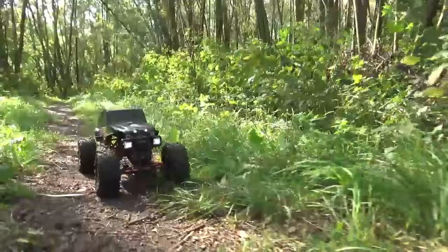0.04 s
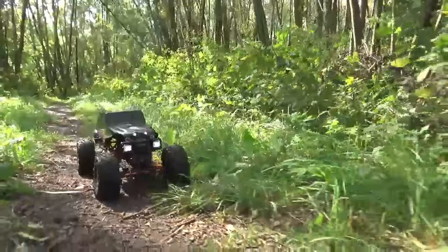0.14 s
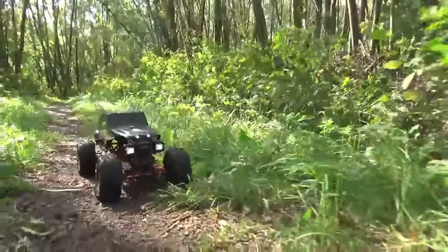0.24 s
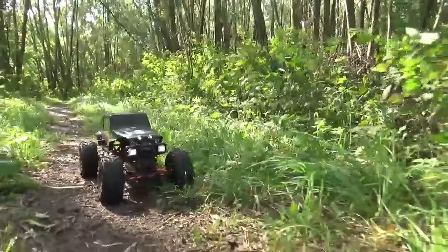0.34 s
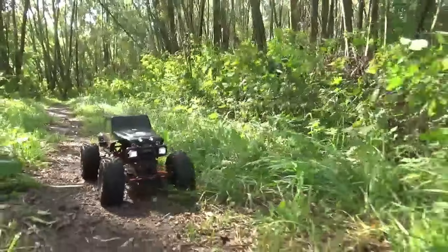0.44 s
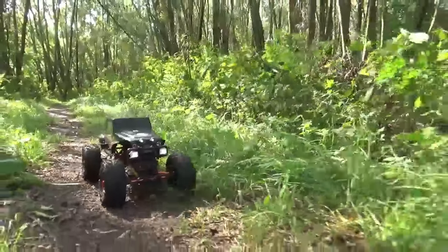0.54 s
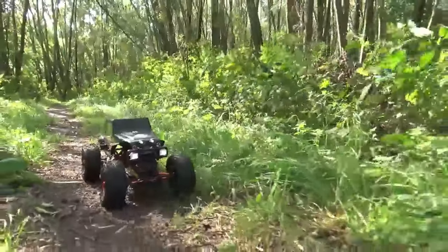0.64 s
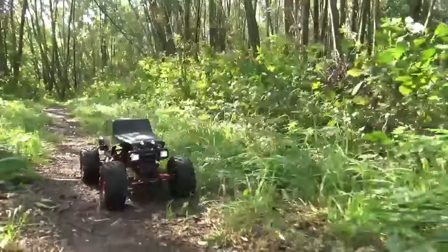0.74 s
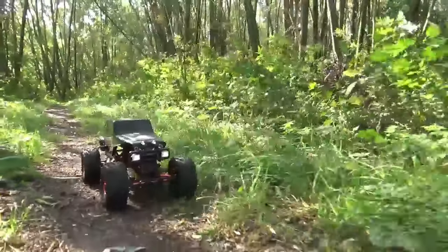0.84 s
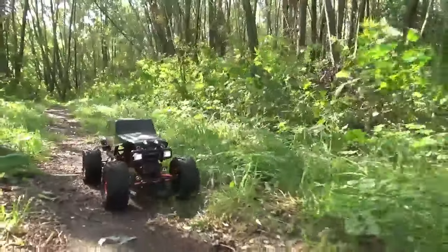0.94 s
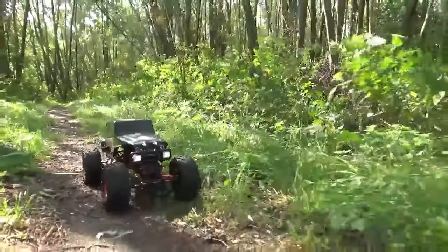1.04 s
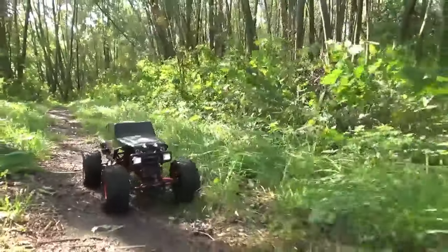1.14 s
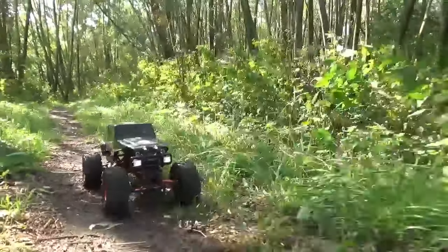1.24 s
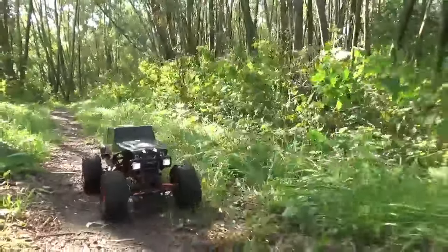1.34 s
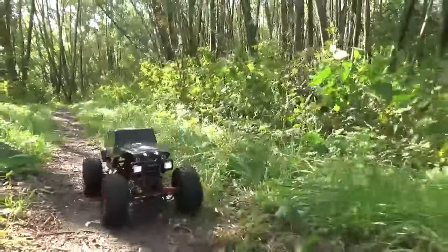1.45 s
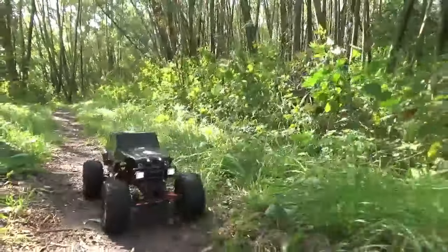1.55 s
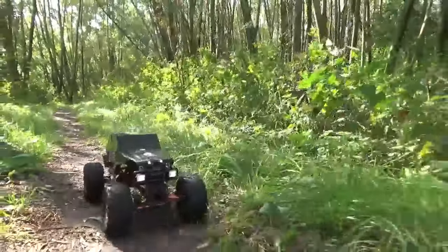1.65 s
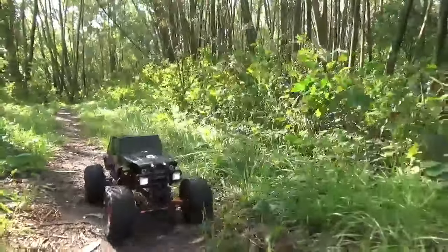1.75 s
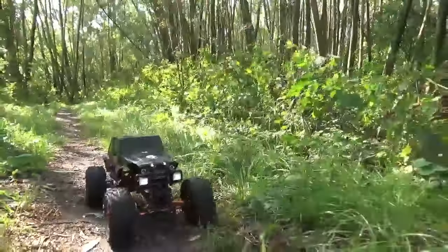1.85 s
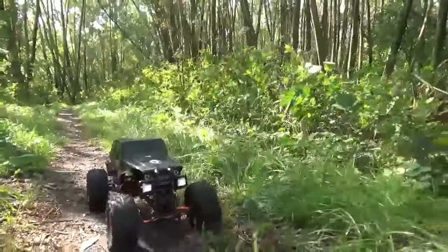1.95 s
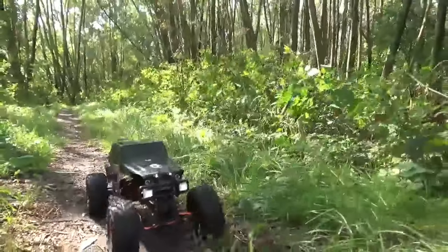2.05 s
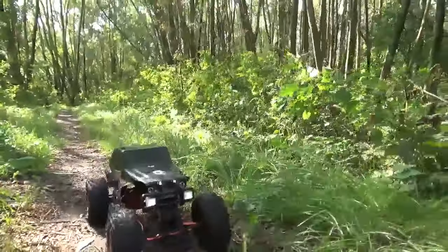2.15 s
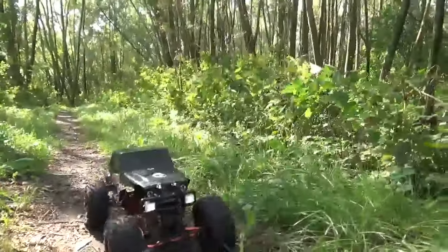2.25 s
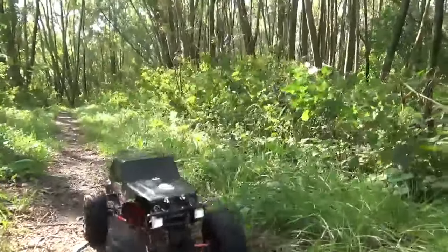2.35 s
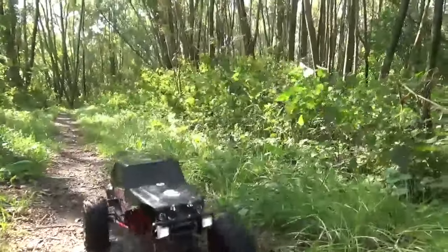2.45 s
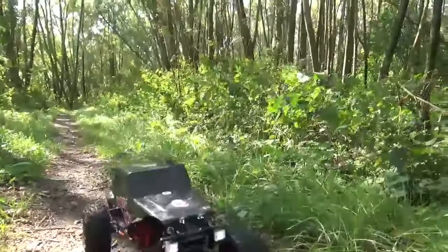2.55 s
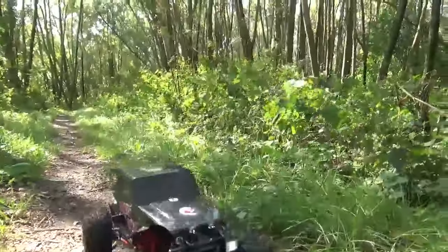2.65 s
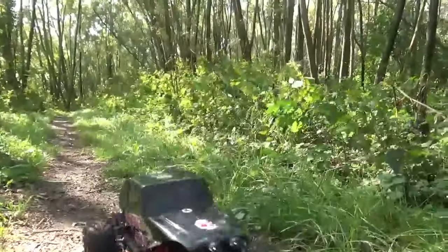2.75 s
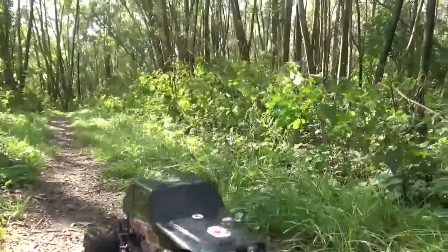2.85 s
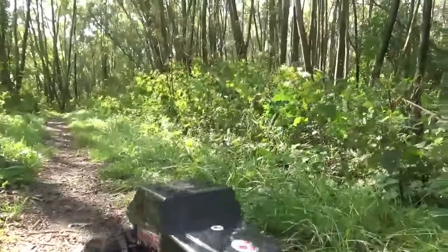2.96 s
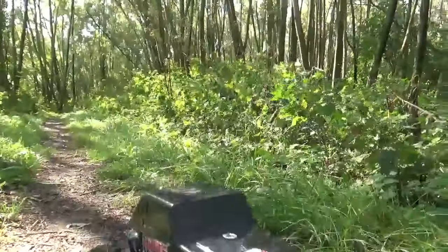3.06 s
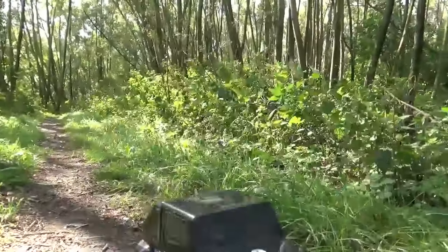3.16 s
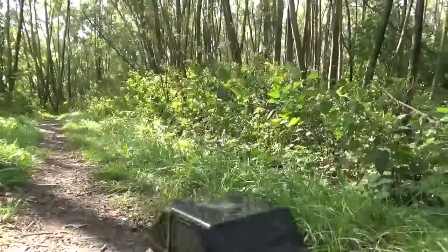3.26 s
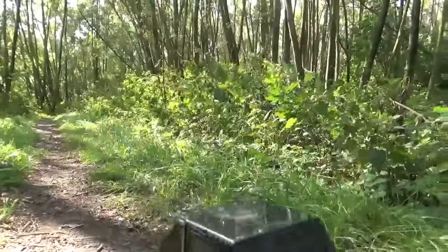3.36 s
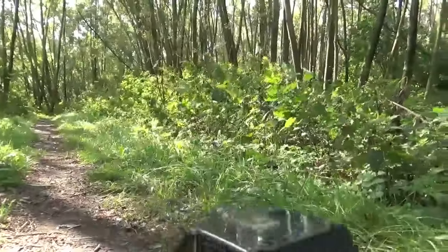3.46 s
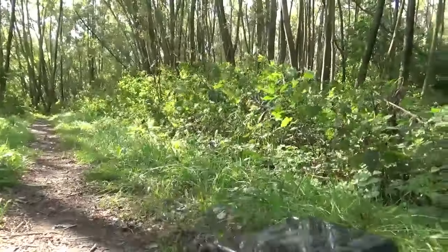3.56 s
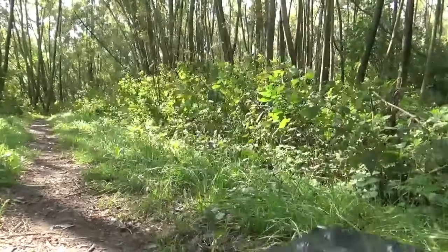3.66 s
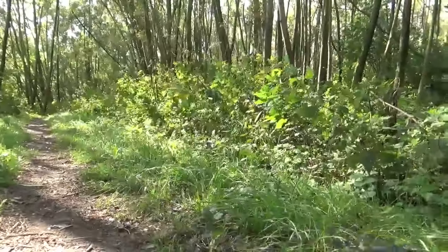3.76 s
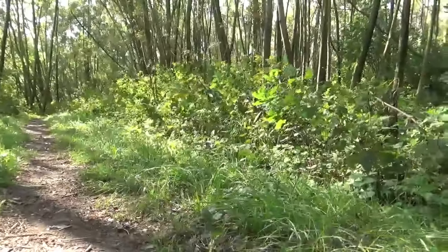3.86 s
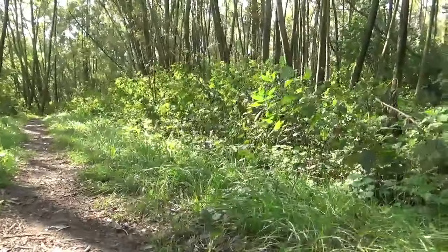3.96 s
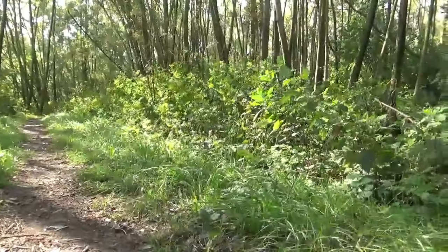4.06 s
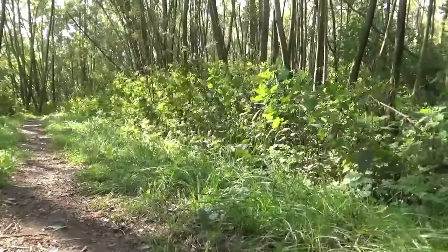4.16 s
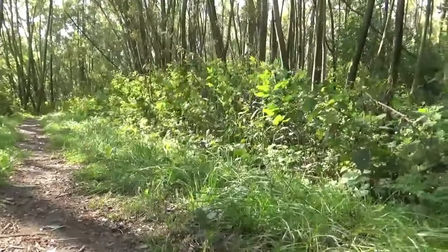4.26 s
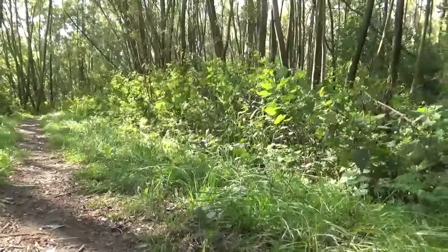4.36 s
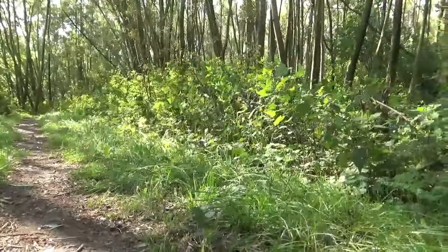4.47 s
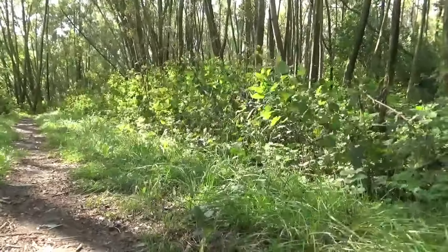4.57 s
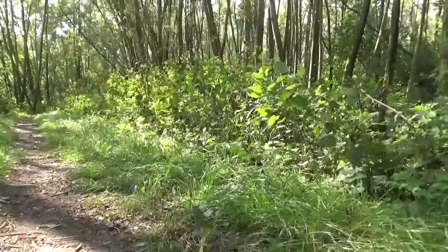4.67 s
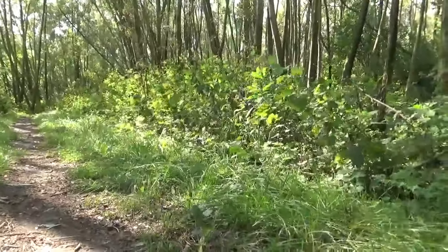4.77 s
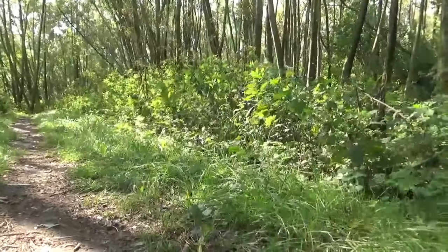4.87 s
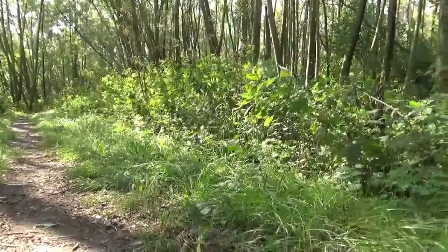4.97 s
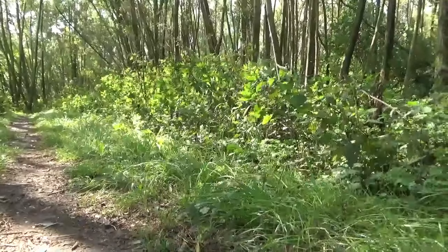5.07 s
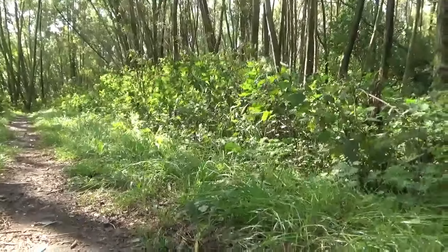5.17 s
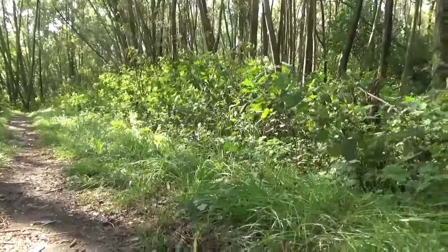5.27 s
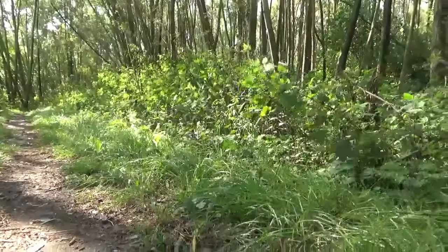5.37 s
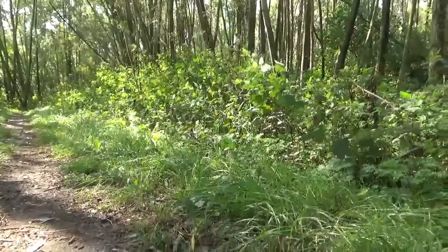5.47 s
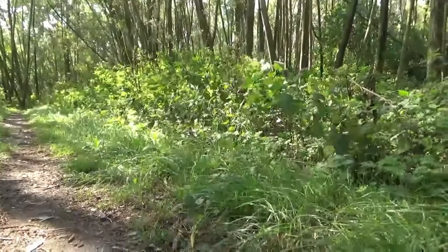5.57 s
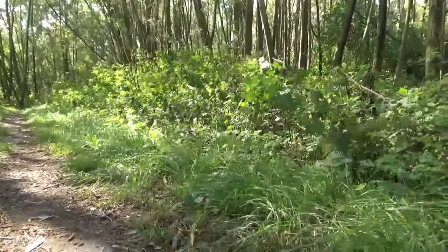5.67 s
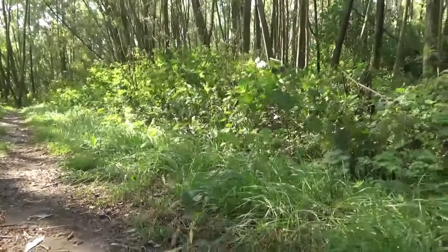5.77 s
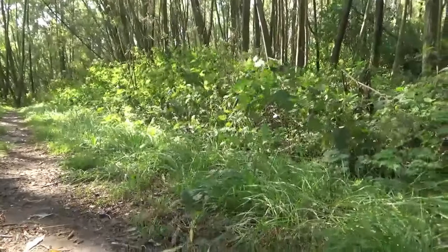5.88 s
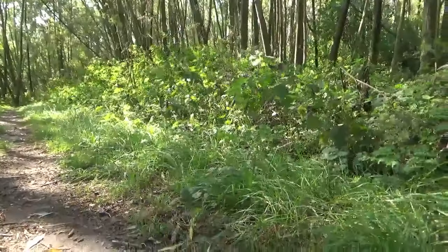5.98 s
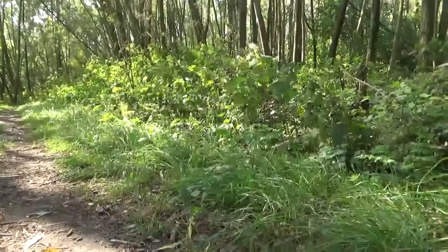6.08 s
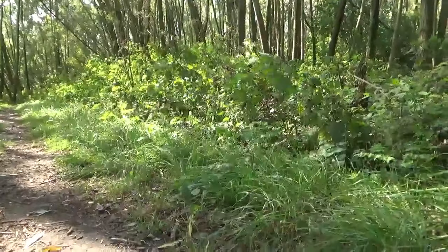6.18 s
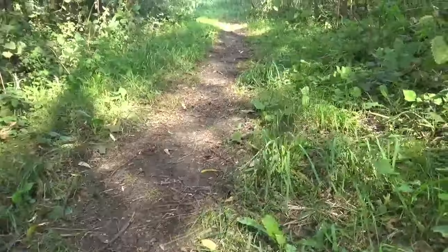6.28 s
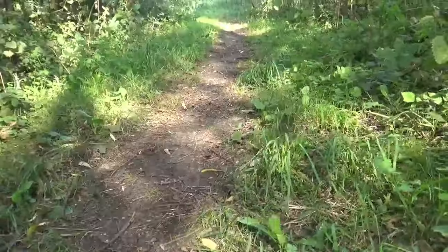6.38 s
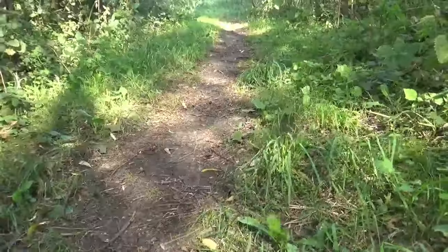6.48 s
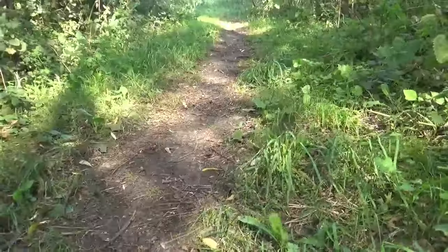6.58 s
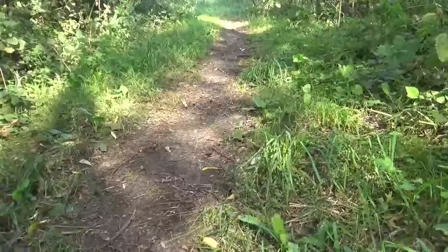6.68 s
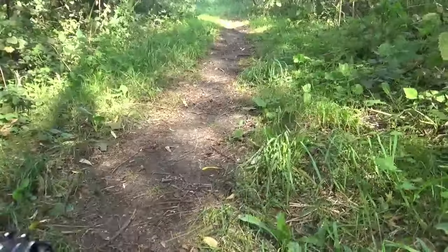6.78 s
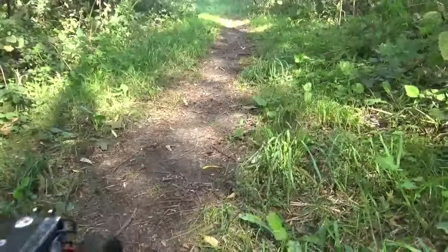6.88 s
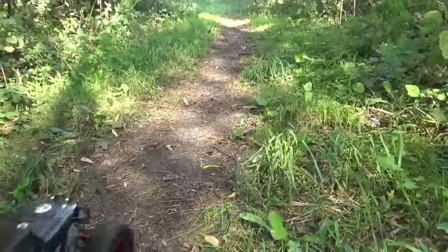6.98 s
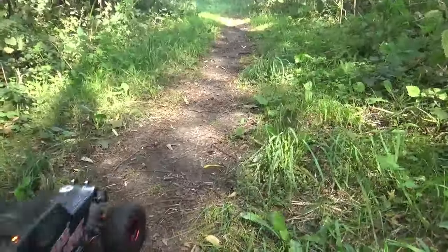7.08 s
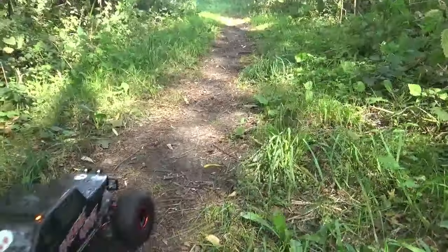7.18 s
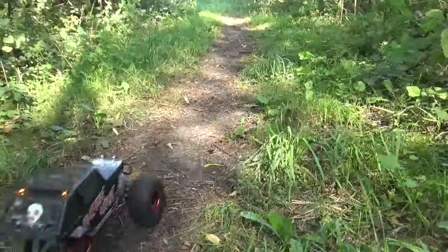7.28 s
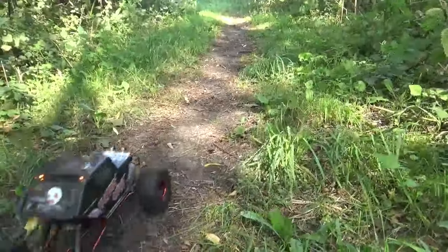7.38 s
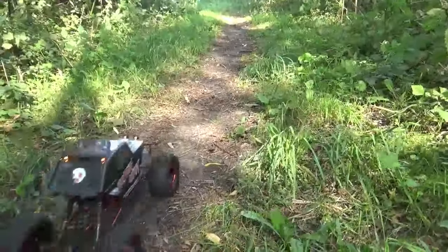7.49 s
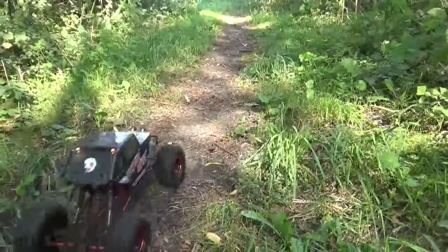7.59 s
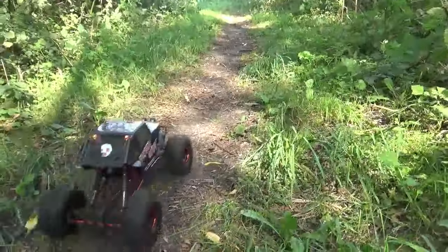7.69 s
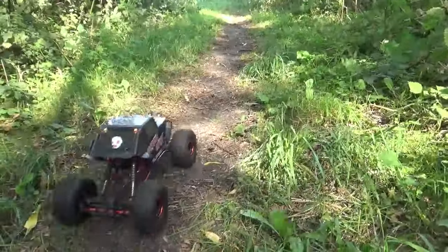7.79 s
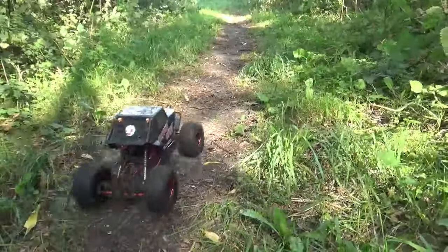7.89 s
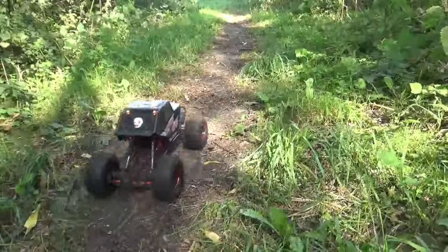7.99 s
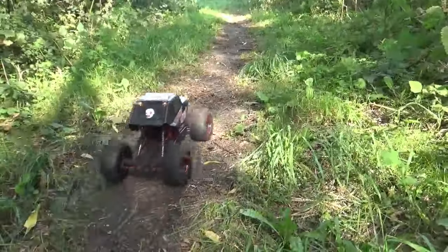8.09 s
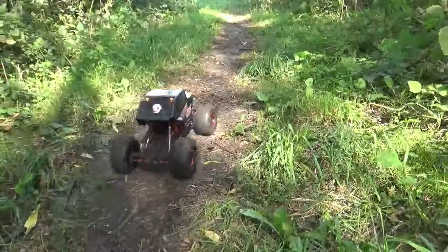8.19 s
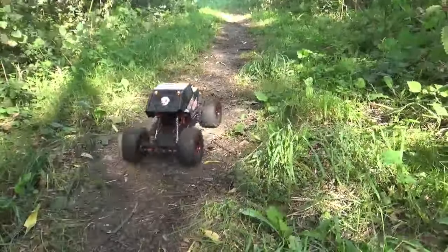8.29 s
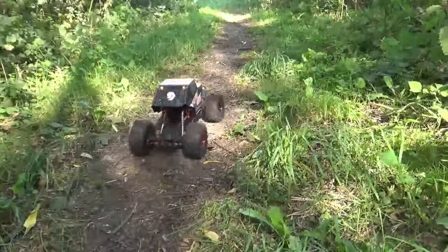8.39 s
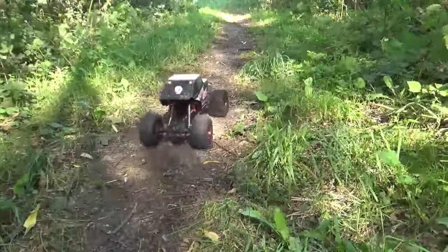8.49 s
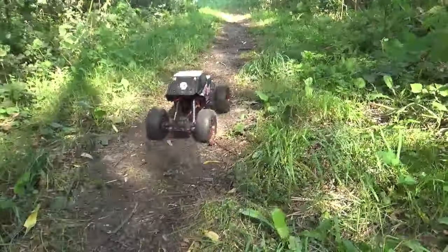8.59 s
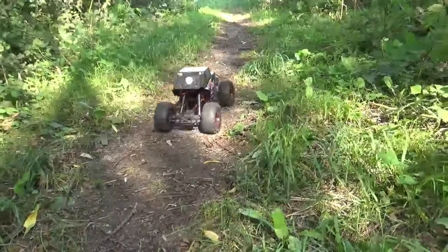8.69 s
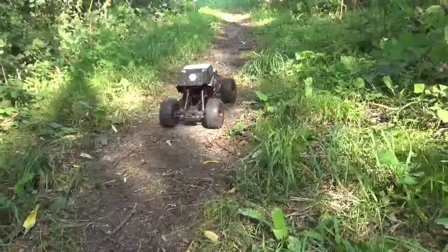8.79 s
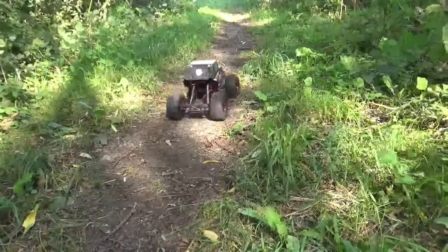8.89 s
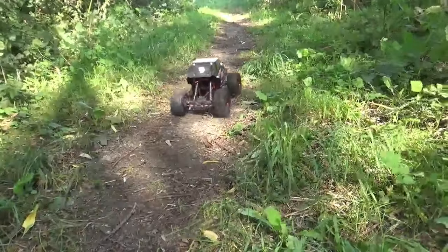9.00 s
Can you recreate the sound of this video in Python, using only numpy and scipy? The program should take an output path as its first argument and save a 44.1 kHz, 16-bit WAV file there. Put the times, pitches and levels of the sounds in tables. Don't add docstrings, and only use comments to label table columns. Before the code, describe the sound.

Outdoors on a dirt forest trail, a small electric toy truck approaches a low stereo microphone. Its dry, metallic gear chatter pulses several times a second, with a thin whine sagging at each pulse. It passes close with hollow body knocks, shifts right and stops just after five seconds. Wind and leaves remain briefly, then it restarts on the left and drives away faster.

```python
import sys
import numpy as np
from scipy import signal
from scipy.fft import rfft, irfft
from scipy.io import wavfile
from scipy.ndimage import uniform_filter1d, map_coordinates

SR = 44100
rng = np.random.default_rng(int(sys.argv[2]) if len(sys.argv) > 2 else 0)


def inscribe(sig):
    pcm = np.round(np.clip(np.atleast_2d(sig).T, -1, 1) * 32767)
    wavfile.write(sys.argv[1], SR, pcm.astype(np.int16))


def invert_db(x):
    u = np.asarray(x, float) / 20
    return 10 ** u


N = 398223
TIME = np.arange(N) / SR
STEP = 32
COARSE = TIME[::STEP]
STOP_S, START_S = 5.3, 6.19

# start in seconds, tooth rate in Hz, how hard the drive binds from 0 to 2,
# whine in dB off its usual level.
WHEEL = [(-.2, 720, 1.8, -1), (.182, 878, 0.95, 1), (.588, 832.4, 1.06, 1.5), (.979, 891, 1.15, 2),
         (1.367, 888, 1.3, 0), (1.732, 933, 1.24, -1), (2.097, 917, 1.16, -9), (2.456, 950, 1.19, -7.5),
         (2.829, 960.4, 0.72, -14), (3.2, 930, 0.74, -13), (3.594, 814, 0.43, -10), (3.986, 832, 0.61, -5),
         (4.399, 900, 0.72, -3), (4.76, 940, 0.38, -3), (5.147, 831, 0.58, 3), (6.34, 900, 0.79, -9),
         (6.661, 961.4, 0.97, -7), (7.008, 1009, 1.2, -8), (7.344, 1057, 0.85, -5), (7.663, 1081, 0.83, -6),
         (7.972, 1109, 0.75, -12), (8.261, 1129, 0.89, -13), (8.572, 1143, 0.81, -7),
         (8.862, 1137, 0.92, -13), (9.16, 1135, 0.79, -13)]
# time in seconds, tooth rate in Hz, whine level in dB.
SPIN_UP = [
    (6.194, 545, -62),
    (6.23, 576, -59),
    (6.27, 681, -64),
    (6.3, 743, -71),
    (6.33, 721, -64),
    (6.371, 678, -60),
    (6.409, 709, -63),
    (6.43, 697, -88),
]


def level(x, db):
    return x * invert_db(db) / np.sqrt(np.mean(x ** 2))


def band(x, hz, width_hz):
    return signal.lfilter(*signal.iirpeak(min(hz, .45 * SR), hz / width_hz, fs=SR), x)


def spread(x, pan_db):
    return x * invert_db(np.array([pan_db, -pan_db]).reshape(2, -1) / 2)


def slow(rate):
    hold = max(int(SR / STEP / rate), 1)
    held = np.repeat(rng.standard_normal(len(COARSE) // hold + 1), hold)
    return 1.3 * uniform_filter1d(uniform_filter1d(held, hold), hold)[:len(COARSE)]


def walk(rate):
    return np.interp(TIME, COARSE, slow(rate))


def swells(s, db, length_s):
    out = np.zeros(N)
    for at, peak_db, span in zip(s, db, length_s):
        first = max(int((at - 2 * span) * SR), 0)
        last = min(int((at + 2 * span) * SR), N)
        i = np.arange(first, last)
        bump = invert_db(peak_db) * np.exp(-((i / SR - at) / (0.46 * span)) ** 2)
        out[i] = np.maximum(out[i], bump)
    return out


def facing(end_db, flank_db, flank):
    return end_db + flank * (flank_db - end_db)


def truck():
    turn, box_db, flank, fizz_db, pan_db = drive()
    tight = binds(turn)
    song, mesh_hz = whine(tight, box_db, flank)
    surge_db = 0.42 * walk(10)
    judder_db = 1.05 * walk(60) + 1.84 * walk(140)
    rattle_db = can_level(turn, box_db, flank) + surge_db
    throb_db = box_throb(turn) + .3 * surge_db
    rattle = motor_can(mesh_hz, flank, rattle_db + judder_db)
    rattle = rattle + brush_fizz(rattle_db + fizz_db + 1.7 * judder_db)
    rattle = rattle + gearbox(mesh_hz, flank, box_db + throb_db + 0.24 * judder_db)
    rattle = rattle + chassis(mesh_hz, flank, box_db, throb_db)
    ease = invert_db(-8 * np.exp(-np.abs(TIME - START_S) / .05))
    body = shell(tight, box_db + facing(-13, -8.5, flank))
    return (rattle * ease + song + body) * running(), pan_db


def drive():
    # time in seconds, gearbox level in dB, share of the side shown from 0 to 1,
    # brush fizz in dB against the rattle, left minus right in dB.
    passing = [(0, -59.5, 0.44, -9, 1.5), (.45, -57.5, 0.36, -11.5, 2.5), (1.2, -57.5, 0.03, -9.5, 1.8),
               (1.9, -57, 0.16, -8, 1.5), (2.4, -52, 0.34, -11, .9), (3.04, -48, 0.46, -11, .1),
               (3.5, -47.5, 0.43, -8, -1.2), (3.95, -48.5, 0.66, -5.5, -5), (4.3, -50.5, 1, -12, -6),
               (5.15, -55, 0.93, -6, -5.5), (5.3, -62.5, .97, -2.5, -4), (6.2, -56, 1, -19, 6.5),
               (6.9, -57, .9, -11.5, 4.5), (7.4, -54, .7, -9, 3), (7.75, -55, 0.37, -7, 1.9),
               (8.3, -55.5, 0.19, -6, 1.2), (9.03, -58.5, 0.32, -0.5, .3)]

    def rolled(s):
        return s - np.clip(s - STOP_S, 0, START_S - STOP_S)

    turn = np.interp(rolled(TIME), rolled(np.transpose(WHEEL)[0]), np.arange(len(WHEEL)))
    t, *columns = np.transpose(passing)
    box_db, flank, fizz_db, pan_db = (np.interp(TIME, t, c) for c in columns)
    return turn, box_db, np.clip(flank, 0, 1), fizz_db, pan_db


def running():
    coast_s, bite_s = .016, .0075
    stopping = 1 / (1 + np.exp(np.clip((TIME - STOP_S) / coast_s, -40, 40)))
    return stopping + np.clip((TIME - START_S) / bite_s, 0, 1)


def throb(turn, shape):
    hard = np.interp(turn - .33, np.arange(len(WHEEL)), np.transpose(WHEEL)[2])
    return hard * uniform_filter1d(np.interp(turn, *np.transpose(shape), period=1), size=700)


def can_level(turn, box_db, flank):
    # share of the wheel turn, level in dB.
    swell = [(.02, 5), (.16, -6), (.31, 4.5), (.44, -7.5), (.57, 3.5), (.74, -2.5), (.81, -1.2),
             (.87, -3.5)]
    return box_db + facing(10.5, 3, flank) + throb(turn, swell)


def box_throb(turn):
    # share of the wheel turn, level in dB.
    swell = [(.005, 3.5), (.15, -4.5), (.31, 2.5), (.47, -3.5), (.63, 3), (.83, -4.5)]
    return throb(turn, swell)


def teeth(at, period, grind):
    timing, force = rng.random((2, len(at)))
    late = (.35 * timing * period).astype(int)
    knocks = np.zeros(N)
    knocks[np.minimum(at + late, N - 1)] = invert_db(np.minimum(-2.0 * np.log(1 - force), 13))
    return level(knocks - knocks.mean(), 0) + grind * rng.standard_normal(N)


def ring(modes, mesh_hz, flank, grind):
    at = np.flatnonzero(np.diff(np.floor(np.cumsum(mesh_hz / SR))))
    gains = [invert_db(facing(end_db, flank_db, flank)) for _, _, end_db, flank_db in modes]
    total = np.sqrt(sum(g ** 2 for g in gains))
    out = 0
    for (hz, width_hz, *_), gain in zip(modes, gains):
        struck = teeth(at, SR / mesh_hz[at], grind)
        tone = level(band(struck, hz, width_hz), 0)
        tone = level(band(tone, hz, 2.4 * width_hz), 0)
        flicker_db = 1.0 * slow(3) + 2.3 * slow(35)
        out = out + tone * np.interp(TIME, COARSE, gain / total * invert_db(flicker_db))
    return out


def motor_can(mesh_hz, flank, can_db):
    # resonance in Hz, width in Hz, level end-on in dB, level from the side in dB.
    modes = [(8774, 360, 3, 0.5), (9440, 460, 0.5, -1), (9960, 540, -10.5, -2.5), (7780, 1230, -2, -4.5),
             (8660, 3500, -3.5, 1.5)]
    return ring(modes, mesh_hz, flank[::STEP], grind=1.5) * invert_db(can_db - 2.0)


def brush_fizz(fizz_db):
    fizz = level(band(band(rng.standard_normal(N), 10600, 2100), 10230, 2200), 0)
    return fizz * invert_db(fizz_db + 2.1 * walk(30) + 1.2 * walk(70))


def gearbox(mesh_hz, flank, box_db):
    # resonance in Hz, width in Hz, level end-on in dB, level from the side in dB.
    modes = [(3816, 180, -5.5, -0.7), (3250, 400, -4, -2), (2743, 450, -1.1, -6.5), (2386, 610, -8, -1),
             (4764, 510, -2, -0.5), (4225, 270, -4, -11.5), (5690, 620, -0.5, -8), (6440, 530, 2.5, 0.5),
             (7150, 250, -4, 0.5)]
    tail_s, tail_turn_s, tail_share = 8.1, .3, 0.59
    open_side = flank[::STEP] + tail_share * np.clip((COARSE - tail_s) / tail_turn_s, 0, 1)
    return ring(modes, mesh_hz, open_side, grind=2.9) * invert_db(box_db - 1.02 + 1.27 * walk(45))


def chassis(mesh_hz, flank, box_db, throb_db):
    # resonance in Hz, width in Hz, level end-on in dB, level from the side in dB.
    modes = [(1628, 228, 0, 0.5), (1300, 320, -2.5, -12), (2067, 180, -3, -9), (900, 440, -2, -10.5),
             (612, 160, -5, -10.5)]
    near_boom_db = 0.25 * (box_db + 55)
    frame_db = box_db + facing(-11.5, -8.5, flank) + near_boom_db
    return ring(modes, mesh_hz, flank[::STEP], grind=3.1) * invert_db(frame_db + 0.6 * throb_db)


def binds(turn):
    # share of the wheel turn, tooth rate in Hz off the mean, sag in Hz, whine in dB, shell in dB.
    spots = [
        (-.02, -5, 130.2, 0, -1.7),
        (.31, 5, 89.6, -2.5, -3.5),
        (.68, 5, 129.4, -.4, -5),
    ]
    share, off_hz, sag_hz, whine_db, shell_db = np.tile(np.transpose(spots), len(WHEEL))
    turns = np.arange(len(WHEEL))
    place = np.repeat(turns, len(spots)) + share
    s = np.interp(place, turn, TIME)
    _, hz, _, sing_db = np.transpose(WHEEL)
    moving = (s < STOP_S) | (s > SPIN_UP[-1][0])
    keep = (place > turn[0]) & (place < turn[-1]) & moving
    hz = np.interp(place, turns, hz) + off_hz
    whine_db = np.interp(place, turns, sing_db) + whine_db
    return np.array([s, hz, sag_hz, whine_db, shell_db])[:, keep]


def whine(tight, box_db, flank):
    # time in seconds, tooth rate in Hz, sag in Hz, whine in dB, octave in dB.
    strains = np.transpose([(.458, 808, 160, -67, -75), (.576, 809, 120, -61, -63),
                            (.973, 900, 120, -62, -82), (5.144, 830, 200, -60.5, -61),
                            (1.978, 886, 140, -64, -82), (2.811, 982, 161, -63, -73),
                            (3.088, 830, 40, -61, -53), (3.289, 932, 81, -62, -65),
                            (3.49, 775, -75, -63, -71), (3.573, 810, 78, -64, -77),
                            (3.734, 877, 80, -63, -51.5), (4.028, 799, 120, -78, -63),
                            (4.113, 900, 100, -58, -52), (4.164, 791, 96, -69, -54),
                            (4.243, 900, 96, -63, -67), (4.29, 829, 5, -58, -63),
                            (4.392, 888, 160, -54, -53), (4.524, 934, 118, -56.5, -55),
                            (4.64, 929, 5, -64, -68), (4.722, 968, 40, -62.5, -63),
                            (4.789, 921, 5, -60.5, -69), (4.877, 951, 80, -60.5, -56.5),
                            (5.025, 853, 120, -60, -54), (7.006, 999, 210, -61.5, -68)])
    s, hz, sag_hz, db, _ = tight
    chance = rng.standard_normal((2, len(s)))
    tone_db = np.interp(s, TIME, box_db + facing(-11, -8, flank)) + db + 2.4 * chance[0]
    octave_db = np.interp(s, TIME, box_db + facing(-22, -11, flank)) + db + 3.4 * chance[1]
    calm = np.abs(s[:, None] - strains[0]).min(axis=1) > .055
    usual = np.array([s, hz + 11 * chance[1], sag_hz, tone_db, octave_db])[:, calm]
    s, hz, sag_hz, tone_db, octave_db = np.hstack([usual, strains])
    span = np.full(len(s), .049)
    t, up_hz, up_db = np.transpose(SPIN_UP)
    knots = np.r_[s - span / 2, s + span / 2, t]
    knot_hz = np.r_[hz + sag_hz / 2, hz - sag_hz / 2, up_hz]
    order = np.argsort(knots)
    mesh_hz = np.interp(TIME, knots[order], knot_hz[order])
    mesh_hz = uniform_filter1d(mesh_hz, size=400) * (1 + .006 * walk(60))
    angle = 2 * np.pi * np.cumsum(mesh_hz) / SR
    pull = uniform_filter1d(invert_db(np.interp(TIME, t, up_db, left=-120, right=-120)), size=500)
    order = np.argsort(s)
    hum_db = np.interp(TIME, s[order], tone_db[order]) + facing(-18.5, -10.5, flank) + 3.4 * walk(18)
    hum = invert_db(hum_db) * ((TIME < t[0]) | (TIME > t[-1]))
    tone = (np.maximum(swells(s, tone_db, span), hum) + pull) * np.sin(angle)
    overtones = np.sin(2 * angle) + 0.43 * np.sin(4 * angle)
    tone = tone + swells(s, octave_db, 0.77 * span) * overtones
    return np.sqrt(2) * tone * invert_db(1.55 * walk(70)), mesh_hz


def shell(tight, body_db):
    # time in seconds, boom level in dB.
    jolts = [(1.596, -59.5), (2.085, -64), (2.469, -58), (2.854, -61.5), (3.048, -54.5), (3.193, -50.5),
             (3.411, -53), (3.537, -58), (3.712, -54), (3.981, -45.5), (4.116, -58), (4.365, -52),
             (4.744, -56), (6.75, -59), (6.899, -58), (6.995, -58.5), (7.129, -59.5), (7.877, -64),
             (8.296, -63), (8.46, -65)]
    shell_hz, width_hz, jolt_s = 491.3, 39, 0.03
    s, _, _, _, shell_db = tight
    light_db = np.interp(s, TIME, body_db) + shell_db + 2.6 * rng.standard_normal(len(s))
    s, db = np.hstack([[s, light_db], np.transpose(jolts)])
    note = np.sqrt(2) * np.sin(2 * np.pi * np.cumsum(shell_hz + 14 * walk(25)) / SR)
    buzz = level(band(band(rng.standard_normal(N), shell_hz, width_hz), shell_hz, 194), 0)
    return note * swells(s, db, np.full(len(s), jolt_s)) + buzz * invert_db(body_db - 8.0)


def trail(x, pan_db):
    # time in seconds, delay of the bounce in milliseconds.
    ground = [(0, 0.16), (2.2, .27), (2.6, .37), (4, 0.42), (5.3, .29), (6.2, .57), (7.1, 0.576),
              (7.4, 0.34), (9.03, 0.54)]
    s, lag_ms = np.transpose(ground)
    place = np.arange(N) - np.interp(TIME, s, lag_ms) * SR / 1000
    share = 0.17
    bounce = map_coordinates(x, [place], order=3, mode="nearest")
    x = (x + share * bounce) / np.sqrt(1 + share ** 2)
    tail = np.arange(8000) / SR
    returns = rng.standard_normal((2, len(tail))) * np.exp(-tail / 0.032) * (tail > .001)
    returns = signal.lfilter([.6], [1, -.45], returns)
    returns = returns / np.sqrt(np.sum(returns ** 2, axis=1, keepdims=True))
    wet = signal.fftconvolve(x[None], returns, axes=1)[:, :N]
    return spread(x, pan_db) + invert_db(-12.5 + np.array([pan_db, -pan_db]) / 5) * wet


def breeze():
    # time in seconds, rumble level in dB.
    gusts = [(0, -70.5), (.53, -52), (.68, -55), (1.16, -63), (1.78, -59.5), (2.34, -67), (3.87, -63),
             (4.7, -60), (5.3, -67.5), (5.83, -69), (6.06, -57.5), (6.28, -73), (6.49, -63.5), (7.87, -69),
             (8.33, -49), (8.5, -62.5), (8.7, -60), (9.03, -57)]
    rumble_db = np.interp(TIME, *np.transpose(gusts))
    flutter_db = -9.5 + 0.47 * (rumble_db + 62.5)
    side = np.array([[1], [-1]])
    lumps_db = 3 * walk(25)
    eddies = rng.standard_normal((4, N))
    low = [level(band(band(e, 80, 127), 60, 135), 0) for e in eddies[:2]]
    high = [level(band(band(band(e, 164, 210), 204, 350), 224, 400), 0) for e in eddies[2:]]
    rumble = (low[0] + .42 * side * low[1]) * invert_db(rumble_db + lumps_db)
    flutter_db = rumble_db + np.minimum(flutter_db, 3) - 6.5 + 0.64 * lumps_db + 3.3 * walk(40)
    flutter = (high[0] + 1.1 * side * high[1]) * invert_db(flutter_db)
    return spread(rumble + flutter, 1.2 * walk(3.02)) + buffets()


def buffets():
    # time in seconds, peak level in dB, pitch in Hz, left minus right in dB.
    puffs = [(0.472, -41, 121, 1), (0.59, -36.5, 254, 5), (0.67, -43, 59.7, 5), (0.827, -49, 78.4, 2),
             (0.94, -48.5, 73.6, -6), (1.289, -47, 139, 4), (1.525, -50.5, 48.4, 3),
             (1.695, -48.5, 67.6, 6), (1.894, -49.5, 83.8, 4), (2.79, -53, 121, -1.0), (2.95, -53, 70, .5),
             (3.753, -56, 119.5, 4), (3.93, -47, 150, -8), (4.365, -48, 95, 1.0),
             (5.025, -49.5, 99.7, -5.5), (5.757, -59, 70.0, -0.5), (5.935, -53, 72.7, -4),
             (6.059, -46.5, 79, 3), (6.2, -64, 75.7, -2.0), (6.725, -52.5, 79.6, -5),
             (6.966, -53.5, 132.2, -0.5), (7.633, -58, 90.1, 0.0), (7.995, -53, 72.8, 6),
             (8.187, -54, 70.5, 2), (8.284, -35, 205.6, -8), (8.34, -42, 190, -4), (8.559, -39, 96.2, 3),
             (8.733, -46, 99.9, 1.5), (8.801, -49, 104.6, -3)]
    out = np.zeros((2, N))
    for s, db, hz, lean_db in puffs:
        cycles = np.arange(int(2.5 * SR / hz)) * hz / SR
        swell = cycles * np.exp(1 - cycles / 0.68) / 0.55
        puff = invert_db(db - 0.5) * np.sin(2 * np.pi * cycles) * swell
        i = int((s + 0.008) * SR)
        out[:, i:i + len(puff)] += spread(puff, lean_db)[:, :N - i]
    return out


def leaves():
    # pitch in Hz, level in dB per Hz.
    colour = [(250, -28.5), (430, -23), (1000, -27), (2000, -32), (4500, -38), (7000, -36.5), (9200, -32.5),
              (11000, -38)]
    hz = np.maximum(np.fft.rfftfreq(N, 1 / SR), 1)
    at, db = np.transpose(colour)
    shape = invert_db(np.interp(np.log(hz), np.log(at), db, left=-80))
    mid, side = rfft(rng.standard_normal((2, N))) * shape
    side = side * np.clip(hz / 3000, .25, .75)
    hiss = irfft(np.array([mid + side, mid - side]), N)
    return level(hiss, -68.5) * invert_db(.6 * walk(2.6))


def scene():
    return trail(*truck()) + breeze() + leaves()


def top_cut(x):
    return signal.sosfilt(signal.butter(12, 11480, fs=SR, output="sos"), x)


def record(dry):
    heard = signal.sosfilt(signal.butter(2, 18, "high", fs=SR, output="sos"), dry)
    heard = signal.sosfilt(signal.ellip(12, .3, 70, 10990, fs=SR, output="sos"), heard)
    heard = .065 * np.tanh(heard / .065)
    return top_cut(heard)


dry = scene()
out = record(dry)
inscribe(out)
```